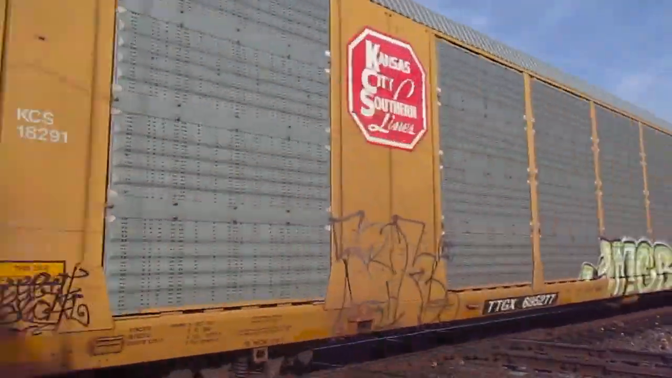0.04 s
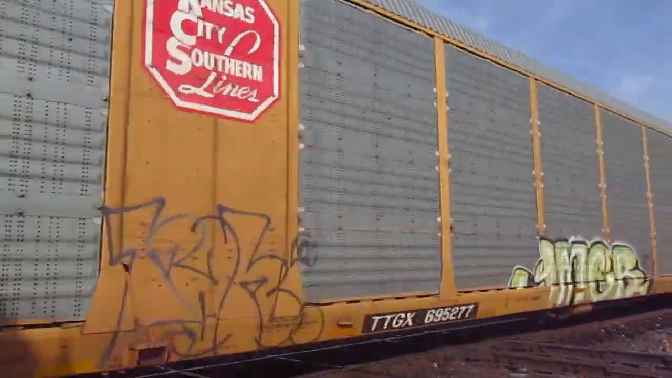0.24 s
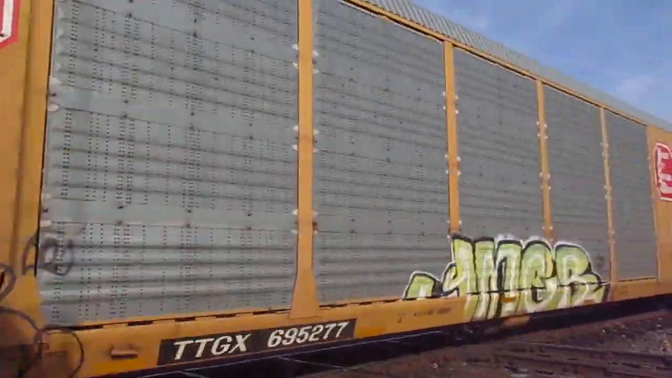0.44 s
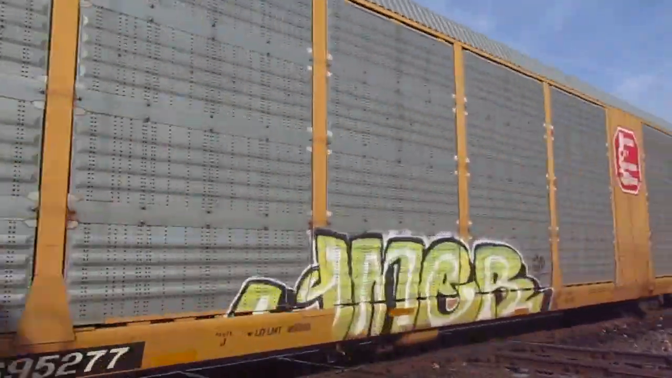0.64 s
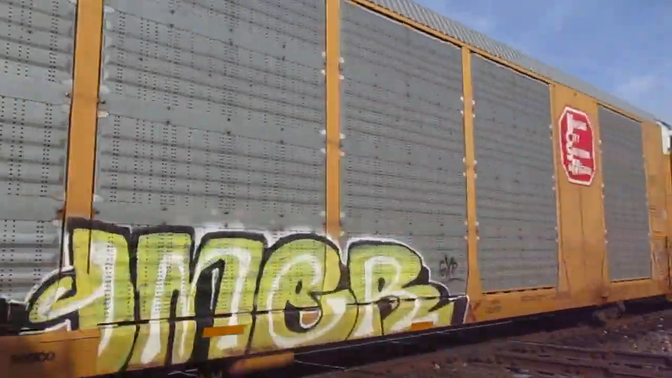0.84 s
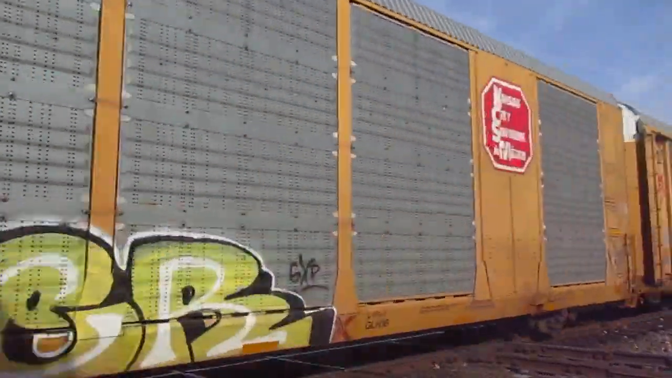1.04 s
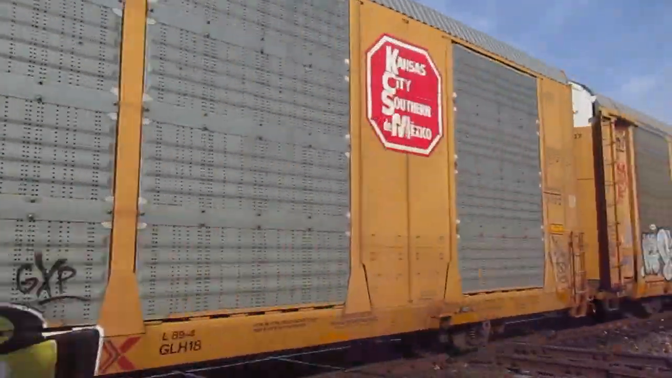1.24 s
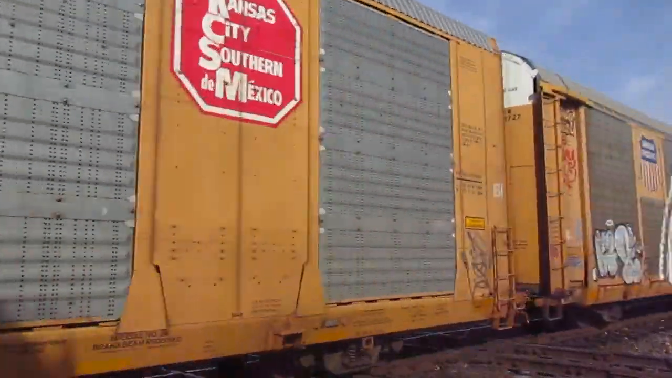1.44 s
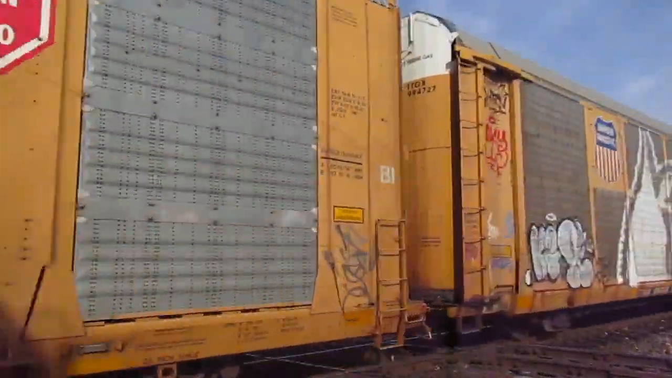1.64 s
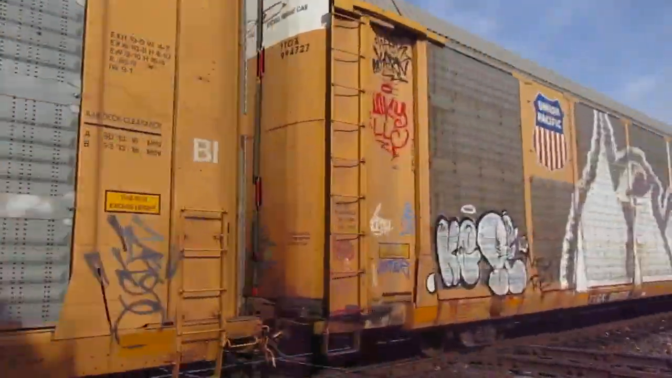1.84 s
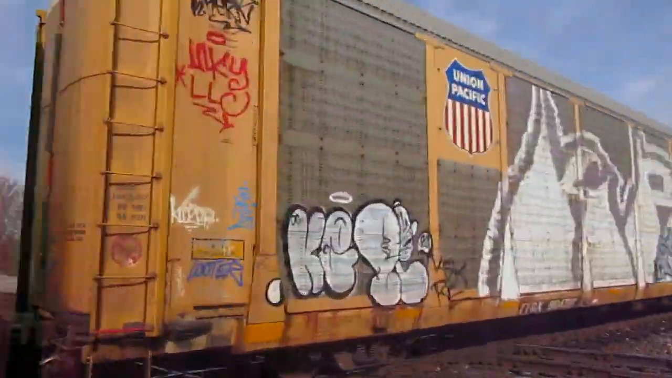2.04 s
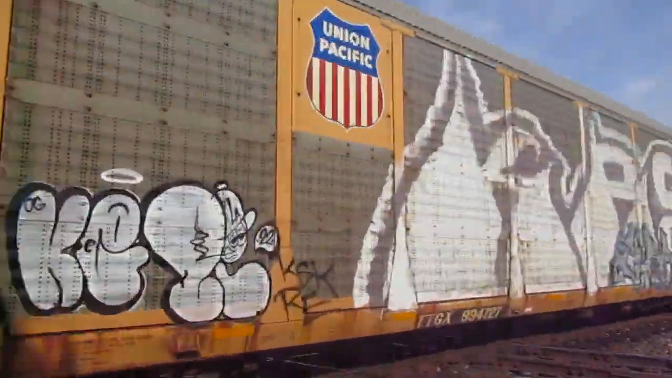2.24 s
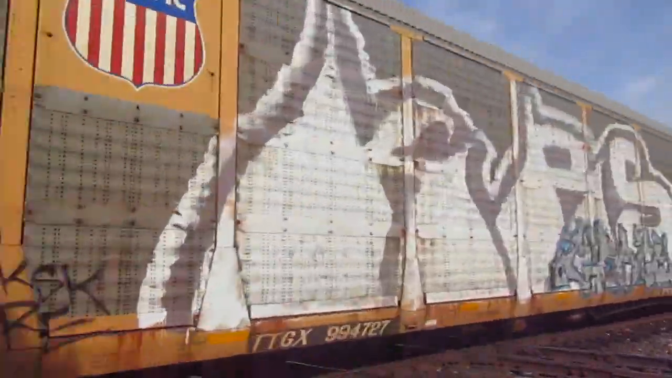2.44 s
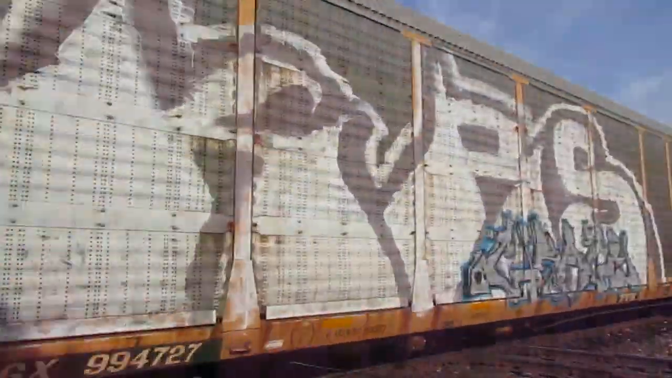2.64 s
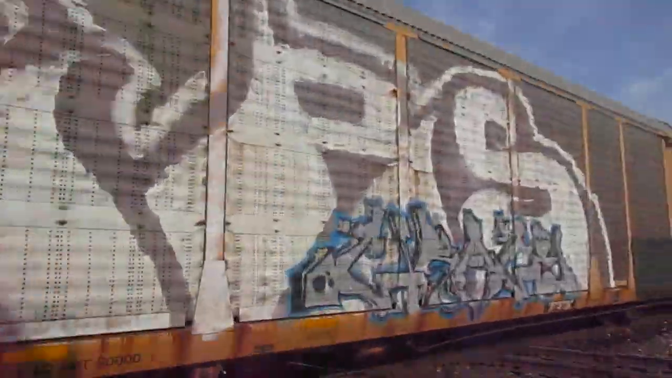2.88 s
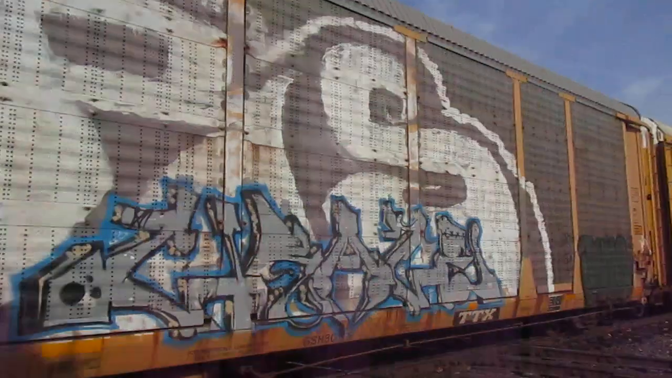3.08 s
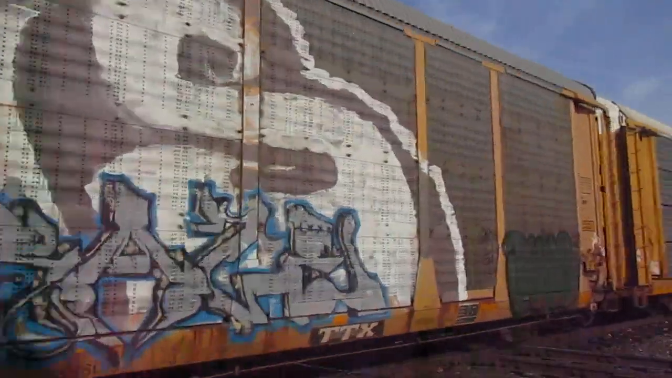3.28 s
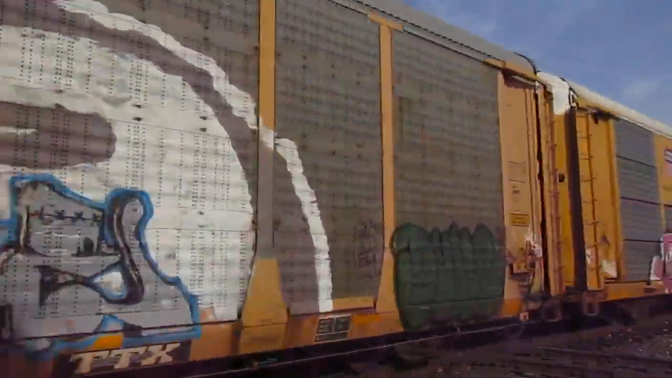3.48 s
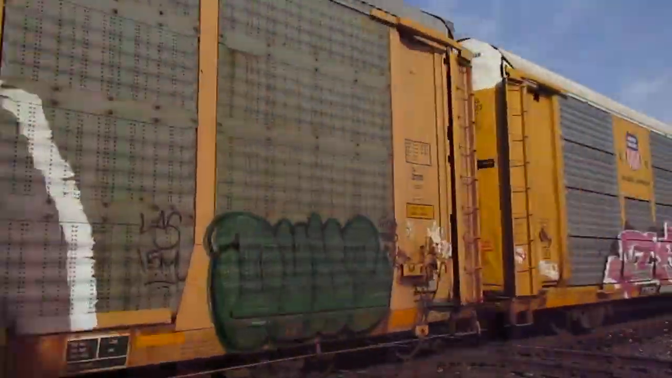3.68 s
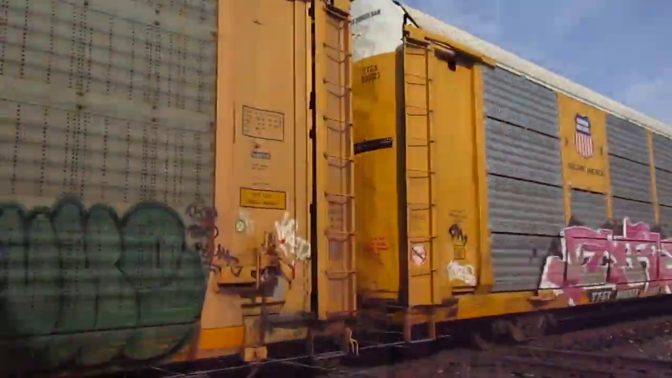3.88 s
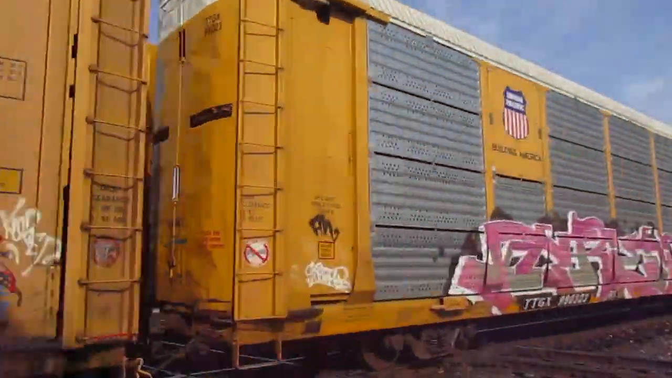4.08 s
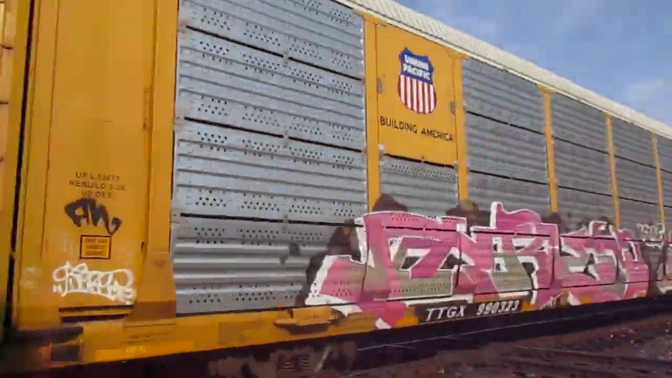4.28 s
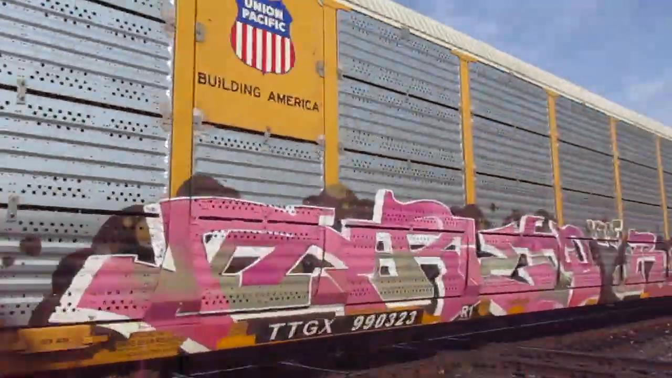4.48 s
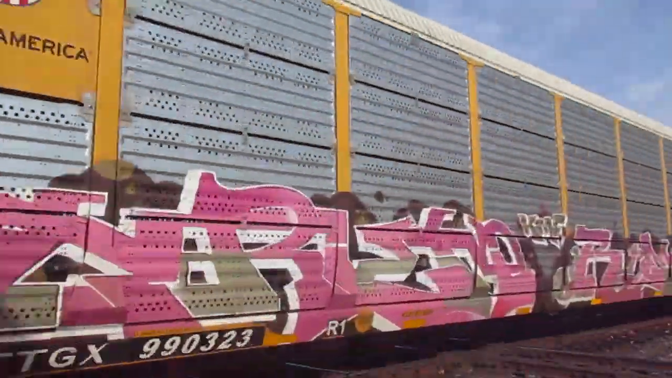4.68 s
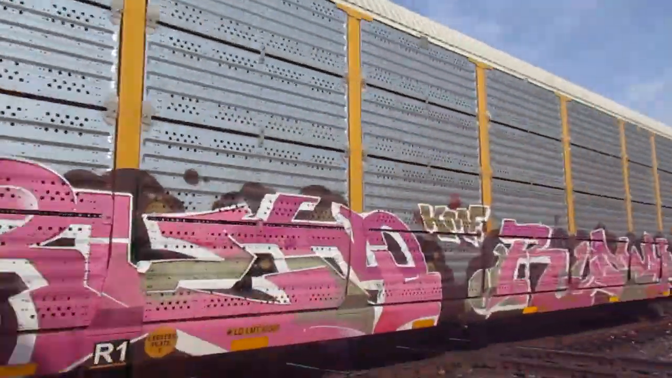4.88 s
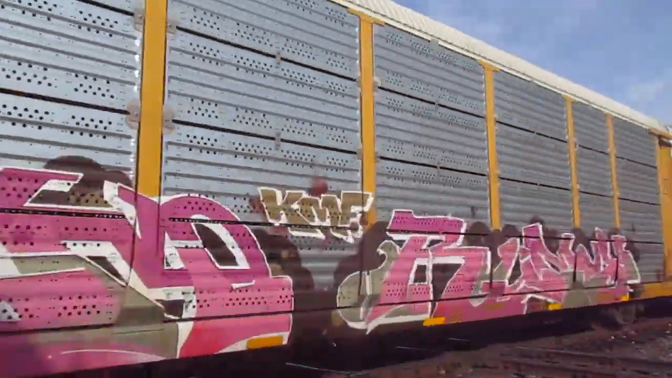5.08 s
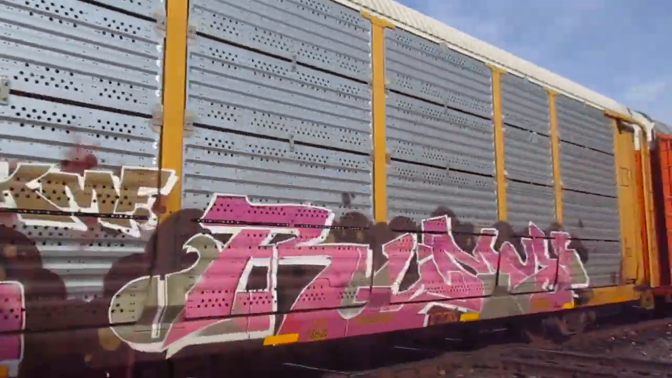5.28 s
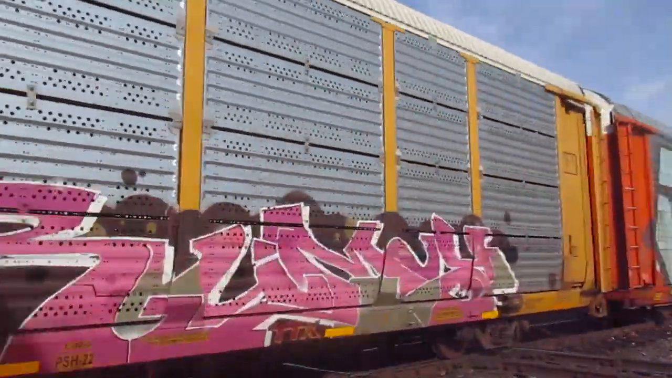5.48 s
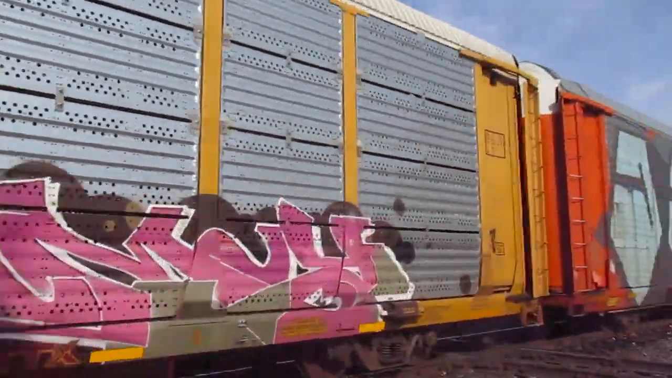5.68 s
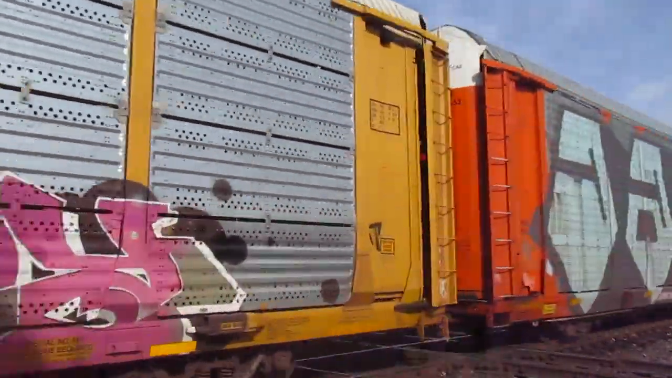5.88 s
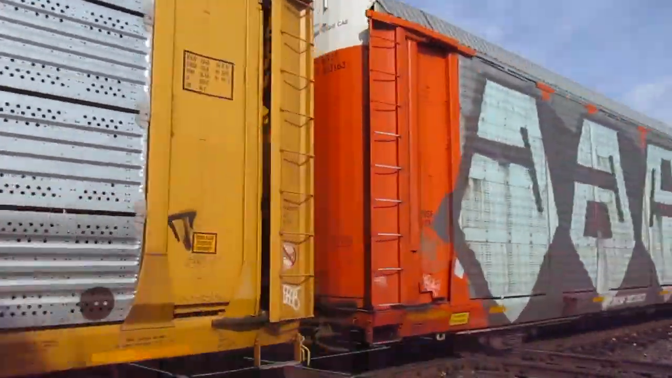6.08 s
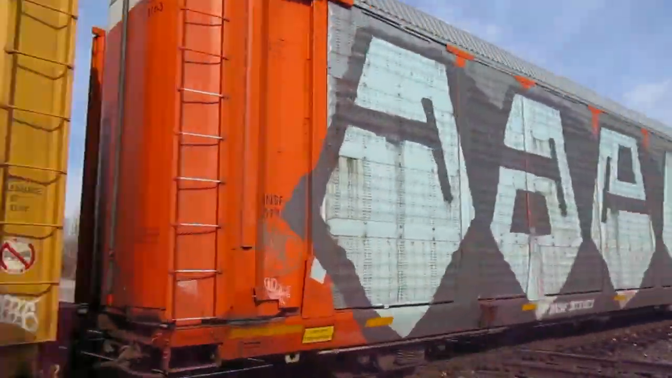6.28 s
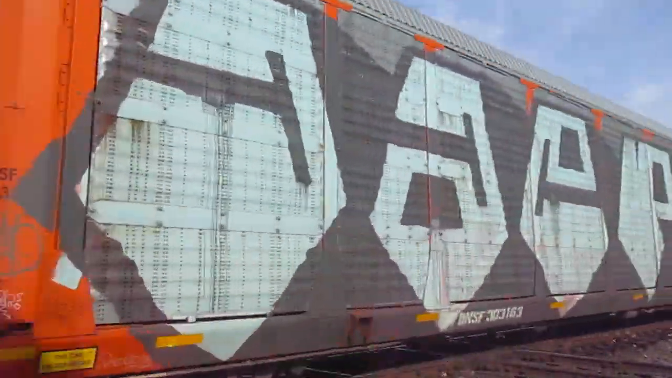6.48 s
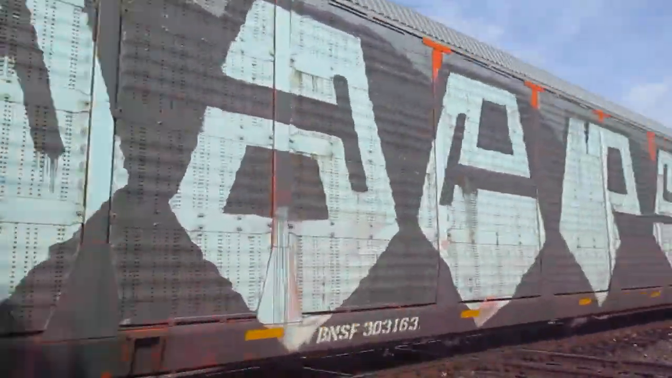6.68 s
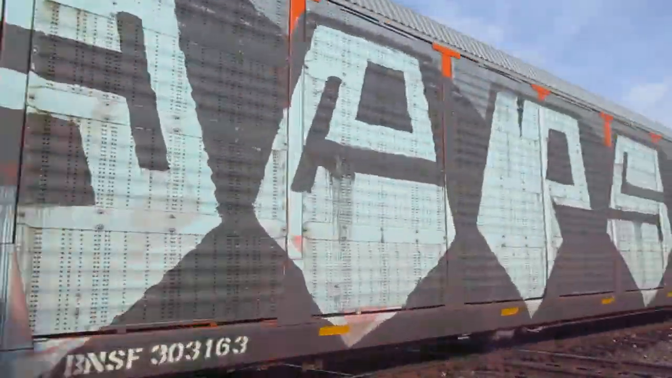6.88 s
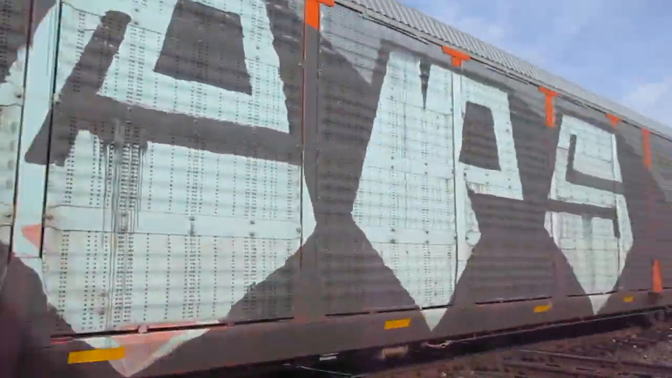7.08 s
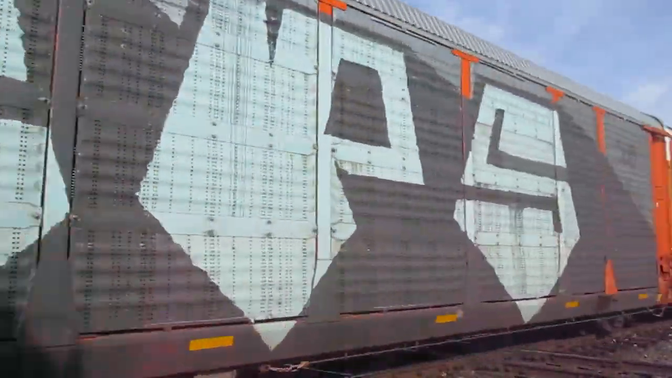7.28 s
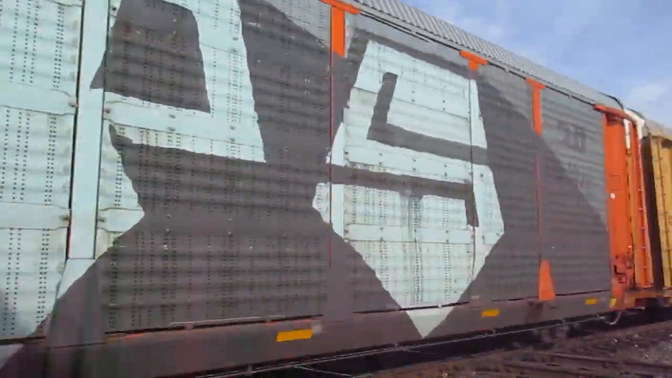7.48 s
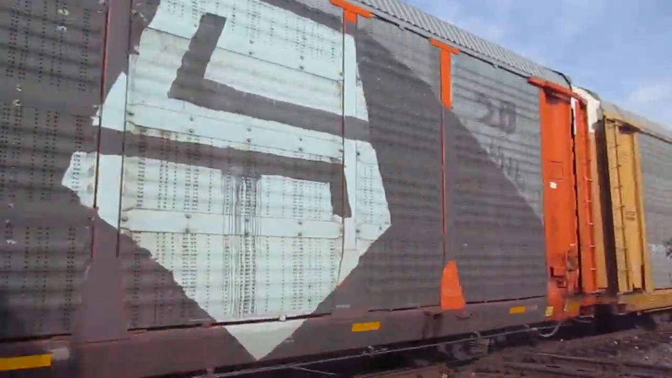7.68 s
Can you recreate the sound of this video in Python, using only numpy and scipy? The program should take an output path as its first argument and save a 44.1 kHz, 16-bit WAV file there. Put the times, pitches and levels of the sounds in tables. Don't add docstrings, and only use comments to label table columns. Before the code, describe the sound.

A freight train rolls past very close outdoors. Its steel wheels batter rail joints in dense, crashing bursts about every two seconds, each burst ringing metallically and fading into a rumbling lull. Two isolated clacks mark each lull, followed by fainter clicks farther along. Thin squeals trail the receding wheels. The small microphone overloads softly on the loudest blows, and its treble is dulled.

```python
import sys
import numpy as np
from scipy import signal
from scipy.fft import rfft, irfft, next_fast_len
from scipy.io import wavfile
from scipy.ndimage import uniform_filter1d, map_coordinates

SR = 44100
rng = np.random.default_rng(int(sys.argv[2]) if len(sys.argv) > 2 else 0)


def level_to_linear(level):
    exponent = np.asarray(level, float) / 20
    return 10 ** exponent


def store_pcm(level_fs):
    pcm = np.round(np.clip(level_fs, -1, 1) * 32767).astype(np.int16)
    wavfile.write(sys.argv[1], SR, np.atleast_2d(pcm).T)


N = 340893

# (first axle arrives [s], last axle leaves [s], lull after it [dB],
# share heard ahead [0-1], knock of first blow [dB])
COUPLINGS = [
    (-.95, .25, 1.8, .25, 0),
    (1.155, 2.38, -.6, .3, -2.5),
    (3.28, 4.52, 0, .13, .5),
    (5.43, 6.66, .7, .08, 2),
    (7.58, 8.8, 0, .25, -5),
]
# (time [s], peak level [dB], web pitch [Hz], web level [dB])
BLOWS_1 = [
    (0, -10, 1167, -6),
    (.05, -1.5, 1430, -12),
    (.1694, -10, 1030, -19),
]
BLOWS_2 = [(1.1761, -3.5, 1082, -4.5), (1.274, -5, 1130, -4), (1.4037, -18, 1360, -1),
           (1.4683, -6.5, 1254, -12), (1.579, -8, 1120, -12), (1.7035, -10.5, 1160, -10),
           (1.7892, -12.5, 1140, -12), (1.9094, -6.5, 1230, -15), (2.0254, -8.5, 1246, -12),
           (2.0809, 0, 1048, -8.5), (2.1884, -3, 1156, -22), (2.3155, -7, 1087, -12)]
BLOWS_3 = [(3.293, -8.5, 1104, -3), (3.33, -9, 1120, -11), (3.4093, -9.5, 1095, -12), (3.436, -6, 1270, -5),
           (3.5444, -11.5, 1050, -12), (3.604, -4, 1227, -9), (3.7165, 0, 1210, -12),
           (3.8447, -6.5, 1290, -13), (3.9585, -11, 1135, -0.5), (4.058, -6, 1280, -12),
           (4.229, -7, 1280, -4), (4.337, -4.5, 1500, -15), (4.386, -11, 1360, -10),
           (4.5188, -24, 956, -13)]
BLOWS_4 = [(5.439, -8.5, 1195, -4.5), (5.5752, -5.5, 1327, -8), (5.6973, -13, 1070, -12),
           (5.7476, -3.5, 1220, -12), (5.8544, -2.5, 1270, -18), (6, -15, 1210, -16),
           (6.0852, -14.5, 1220, 1), (6.1793, -4, 1106, -14), (6.3282, -5.5, 1280, -8),
           (6.3876, -3, 1284, -9), (6.4827, 0, 965, -12), (6.6173, -8, 1514, -5)]
BLOWS_5 = [
    (7.595, -4, 1223, -7),
    (7.7006, -4.5, 1192, -4),
]
# (time [s], peak level [dB], web pitch [Hz], web level [dB])
CLACKS = [
    (.417, -16.5, 912, -9),
    (0.5344, -13, 866, -10),
    (2.5436, -13.5, 1020, -9),
    (2.6733, -12, 1038, -13),
    (4.692, -13.5, 1017, -13),
    (4.8221, -13.5, 1090, -9),
    (6.8394, -19, 950, -8),
    (6.9565, -12, 980, -13),
]
# (time [s], peak level [dB], web pitch [Hz], web level [dB])
THUDS = [
    (1.129, -25.5, 1100, -13.5),
    (3.2296, -28, 1270, -12),
    (5.41, -26, 1060, -12),
    (7.552, -26, 974, -12),
]
# (delay [s], peak level [dB])
FAR_JOINTS = [
    (.27, -27.5),
    (0.521, -35),
]
# (time [s], peak level [dB], web pitch
# [Hz], web level [dB])
TICKS = [
    (.6694, -33, 890, -6),
    (2.6453, -26, 845, 4),
    (4.9132, -32, 912, -9),
]
# (frequency [Hz], level [dB], t60 [s])
WHEEL_MODES = [(2000, 1.5, 0.15), (2520, -7.5, 0.22), (3230, -9, .25), (3930, -12, 0.28), (5130, -20, 0.2),
               (5600, -7, 0.29)]
# (frequency [Hz], density [dB per Hz])
KNOCK_SPECTRUM = [(120, -36), (250, -7), (500, 1.5), (900, -4), (1250, -2.5), (1600, -13.5), (2400, -28)]
# (frequency [Hz], density [dB per Hz])
CRASH_SPECTRUM = [(800, -6.5), (1600, -3.5), (2000, -3), (4000, -8.5), (4800, -8.5), (8000, -8.5),
                  (15000, -8)]

# (time [s], frequency [Hz], level [dB], t60 [s])
PINGS = [(.415, 3000, -30, .16), (.415, 2050, -23, .15), (2.017, 3760, -16, .15), (2.08, 2000, -15, .4),
         (2.565, 1965, -29, 0.37), (2.56, 1545, -30, .21), (2.675, 4040, -27, 0.33),
         (2.689, 3230, -31, 0.23), (2.701, 2560, -31, 0.21), (4.7, 3100, -33, .4), (4.822, 2105, -20, 0.12),
         (4.822, 2850, -27, 0.13), (4.822, 3570, -24, 0.14), (6.958, 2090, -31, .12),
         (7.691, 3070, -17, .18)]
# (time [s], frequency [Hz], pitch fall [share], level [dB], t60 [s])
SQUEALS = [
    (.2, 3440, .02, -30.5, 1.8),
    (2.3, 4120, .01, -34, .99),
    (2.61, 2550, 0.0018, -39, .6),
    (4.47, 3630, .014, -28.5, 0.98),
    (4.5, 1984, 0, -19, .34),
    (5.758, 8700, 0, -20, .9),
    (5.8, 9450, .005, -24, 2.7),
    (6.68, 3480, .027, -26.5, 0.72),
]

# (lull [dB], surge [dB], build-up [s], sag [dB per s], quick release [s], slow release [s])
RUMBLE_LAW = (-29.5, -13, 0.09, 3, 0.18, 0.47)
ROAR_LAW = (-33, -16.5, .12, -0.7, 0.08, .5)
HISS_LAW = (-41.5, -21.5, 0.04, 1.76, 0.2, .5)
# (frequency [Hz], density [dB per Hz])
SLEEPERS_NEAR = [(15, -50), (30, -39), (60, -12), (85, -9.5), (130, -6), (155, -11), (185, -2), (300, -6.5),
                 (400, -13.5), (700, -35)]
RAIL_NEAR = [(150, -56), (300, -15.5), (450, -1), (700, 3.5), (950, -4.5), (1300, -2), (1700, -14.5),
             (2500, -16.5)]
TREAD_NEAR = [(800, -37), (1600, -2), (2200, -2.5), (4000, -7), (4800, -12.5), (8000, -11), (15000, -15.5)]
# (frequency [Hz], density [dB per Hz])
SLEEPERS_FAR = [(15, -35), (30, -15), (65, -5), (95, -10.5), (123, -1), (160, -6), (270, -2.5),
                (420, -11.5), (700, -51)]
RAIL_FAR = [(150, -22), (330, -2.5), (550, 0), (900, -6), (1300, -11), (1800, -16.5), (2800, -31.5)]
TREAD_FAR = [(800, -29), (1500, -0.5), (2200, -0.5), (4300, -6), (4800, -5.5), (8000, -11), (15000, -36)]
# (frequency [Hz], width [Hz], level [dB])
BOUNCE_TONE = (226.4, 18, -0.91)
# (time [s], peak level [dB])
BOUNCES = [(.03, -11.5), (.19, -9), (.41, -19), (1.185, -10), (1.31, -13), (1.49, -13), (1.62, -13.5),
           (1.76, -27), (1.92, -14), (2.09, -13), (2.21, -10.5), (2.35, -17), (2.75, -31), (3.32, -13),
           (3.48, -14), (3.66, -12), (3.86, -19), (4.07, -15), (4.28, -20), (4.44, -15.5), (4.85, -25),
           (5.46, -11), (5.6, -8), (5.97, -22), (6.17, -20), (6.52, -10), (6.64, -12), (6.88, -25),
           (7.0, -23), (7.605, -10.5)]
# (frequency [Hz], gain [dB])
MICROPHONE = [(22, -1), (45, -3), (70, -0.5), (3000, -0.5), (4250, -4), (4650, -7.5), (6000, -11),
              (9000, -19), (12000, -29), (14000, -36), (15000, -40)]


def unit(x):
    return x / np.sqrt(np.mean(x ** 2) + 1e-20)


def coloured(x, spectrum):
    size = next_fast_len(N + 8192)
    hz, db = np.transpose(spectrum)
    log_hz = np.log(np.fft.rfftfreq(size, 1 / SR) + 1)
    gain = level_to_linear(np.interp(log_hz, np.log(hz + 1), db))
    return irfft(rfft(x, size) * gain, size)[:N]


def rush(spectrum, patchy_db):
    grains = signal.stft(rng.standard_normal(N + 512), nperseg=512)[2]
    patches = uniform_filter1d(rng.standard_normal(grains.shape), size=4, axis=0)
    patches = uniform_filter1d(patches, size=12, axis=1)
    noise = signal.istft(grains * level_to_linear(patchy_db * unit(patches)), nperseg=512)[1][:N]
    return unit(coloured(noise, spectrum))


def wobble(rate):
    return map_coordinates(rng.standard_normal(2000), [np.arange(N) * rate / SR])


def strikes(table, rise, t60, knock_db, modes_db, damping):
    t = np.arange(SR // 2) / SR
    knock_power, crash_power, ring = np.zeros((3, N + SR))
    hz, level, decay = np.transpose(WHEEL_MODES)[:, :, None]
    luck = rng.standard_normal((len(table), 3, len(WHEEL_MODES), 1))
    bodies_db = knock_db + np.zeros(len(table))
    onset = 1 - np.exp(-t / rise)
    beat = 1 + 0.53 * np.cos(2 * np.pi * 40 * t)
    for (s, db, web_hz, web_db), body_db, (detune, strength, phase) in zip(table, bodies_db, luck):
        at = slice(round(s * SR), round(s * SR) + len(t))
        crash_power[at] += (level_to_linear(db - 1.5 - 60 * t / t60) * onset) ** 2
        knock_power[at] += (level_to_linear(db + body_db - 2.5 - 60 * t / (1.15 * t60)) * onset) ** 2
        tones = np.sin(2 * np.pi * (hz * (1 + 0.0128 * detune) * t + phase))
        modes = level_to_linear(level + 5.8 * strength - 60 * damping * t / decay) * tones
        web = level_to_linear(web_db - 60 * t / 0.22) * beat * np.sin(2 * np.pi * web_hz * t)
        ring[at] += level_to_linear(db) * onset * (level_to_linear(modes_db) * modes.sum(0) + web)
    knock = np.sqrt(knock_power[:N]) * rush(KNOCK_SPECTRUM, patchy_db=-0.5)
    crash = np.sqrt(crash_power[:N]) * rush(CRASH_SPECTRUM, patchy_db=2.0)
    return knock + crash + ring[:N]


def hammering():
    blows = BLOWS_1 + BLOWS_2 + BLOWS_3 + BLOWS_4 + BLOWS_5
    arrive, leave, _, _, first_db = np.transpose(COUPLINGS)
    last_db = np.full(len(leave), -6.0)
    ends = np.ravel([arrive, leave], "F")
    ends_db = np.ravel([first_db, last_db], "F")
    body_db = np.interp(np.transpose(blows)[0], ends, ends_db)
    return strikes(blows, rise=0.008, t60=0.33, knock_db=body_db, modes_db=-13, damping=1.23)


def lone_clacks():
    return strikes(CLACKS, rise=0.00073, t60=0.13, knock_db=2.6, modes_db=-11.5, damping=2.8)


def rail_end_thuds():
    return strikes(THUDS, rise=0.0086, t60=0.33, knock_db=8.5, modes_db=-12, damping=1.0)


def faint_clicks():
    farther = [(s + delay, db, hz, web_db) for delay, db in FAR_JOINTS for s, _, hz, web_db in CLACKS]
    return strikes(farther + TICKS, rise=0.0013, t60=0.13, knock_db=-4.0, modes_db=-11, damping=2.5)


def singing_rims():
    t, out = np.arange(SR) / SR, np.zeros(N + SR)
    # start [s], swell [s], frequency [Hz], pitch fall [share], level [dB], t60 [s]
    rings = [(s, 0.0047, hz, 0.006, db, t60) for s, hz, db, t60 in PINGS]
    rings += [(s, 0.03, hz, fall, db, t60) for s, hz, fall, db, t60 in SQUEALS]
    luck = rng.random((len(rings), 2))
    for (s, swell, hz, fall, db, t60), (split, twin) in zip(rings, luck):
        phase = 2 * np.pi * hz * (t - fall * t * t / 0.6)
        pair = np.sin(phase) + (0.2 + 0.3 * twin) * np.sin((1.012 + 0.012 * split) * phase)
        envelope = level_to_linear(db - 60 * t / t60) * (1 - np.exp(-(t / swell) ** 2))
        out[round(s * SR):][:SR] += envelope * pair
    return out[:N] * level_to_linear(1.0 * wobble(30))


def follow(law):
    lull_db, surge_db, build, sag_db, quick, slow = law
    arrive, leave, after_db, swell_share, _ = np.transpose(COUPLINGS)[:, :, None]
    t = np.arange(N) / SR
    since, gone = np.maximum(t - arrive, 0), np.maximum(t - leave, 0)
    ahead = swell_share * np.exp(np.minimum(t - arrive, 0) / 0.08)
    quick_share = 0.51
    fade = quick_share * np.exp(-gone / quick) + (1 - quick_share) * np.exp(-gone / slow)
    near = (ahead + (1 - ahead) * (1 - np.exp(-since / build))) * fade
    rise_db = near * (surge_db - lull_db - sag_db * (since - gone))
    latest = np.maximum((t > arrive).sum(0) - 1, 0)
    lull_shift_db = uniform_filter1d(after_db[latest, 0], size=4000)
    return lull_db + rise_db.max(0) + lull_shift_db * (1 - near.max(0))


def rolling():
    rumble, roar, hiss_db = level_to_linear(follow(RUMBLE_LAW)), level_to_linear(follow(ROAR_LAW)), follow(HISS_LAW)
    hiss = level_to_linear(hiss_db)
    nearness = np.clip((hiss_db + 38) / 14, 0, 1)
    rattle = level_to_linear(0.82 * wobble(18))
    close = rumble * rush(SLEEPERS_NEAR, patchy_db=0.4)
    close += rattle * roar * rush(RAIL_NEAR, patchy_db=2.0)
    close += rattle * hiss * rush(TREAD_NEAR, patchy_db=0.0)
    far = rumble * rush(SLEEPERS_FAR, patchy_db=3.0)
    far += roar * rush(RAIL_FAR, patchy_db=1.5)
    far += hiss * rush(TREAD_FAR, patchy_db=0.2)
    return np.sqrt(nearness) * close + np.sqrt(1 - nearness) * far


def track_bounce():
    s, peak_db = np.transpose(BOUNCES)[:, :, None]
    knots = np.arange(0, N, 64)
    late = knots / SR - s
    drop_db = np.where(late < 0, -500 * late, 95 * late)
    level_db = np.maximum((peak_db - drop_db).max(0), -38)
    level_db = np.interp(np.arange(N), knots, level_db)
    hz, width, db = BOUNCE_TONE
    band = [(hz - 4 * width, -30), (hz - width / 2, -3), (hz, 0), (hz + width / 2, -3), (hz + 4 * width, -30)]
    return level_to_linear(level_db + db) * rush(band, patchy_db=2.5)


def scene():
    struck = hammering() + lone_clacks() + rail_end_thuds() + faint_clicks()
    return (struck + singing_rims() + rolling() + track_bounce())[None]


def roll_off(x):
    return signal.sosfilt(signal.butter(12, 15030, fs=SR, output="sos"), x)


def record(dry):
    low, high = np.exp(-2 * np.pi * np.array([25, 130]) / SR)
    loud = level_to_linear(1.5) * signal.lfilter([1, -high], [1, -low], dry[0])
    squeezed = loud / (1 + np.abs(loud / 0.71) ** 3.7) ** (1 / 3.58)
    coupled = signal.lfilter([1, -low], [1, -high], squeezed)
    mix = coloured(coupled, MICROPHONE)[None]
    return roll_off(mix)


dry = scene()
out = record(dry)
store_pcm(out)
```